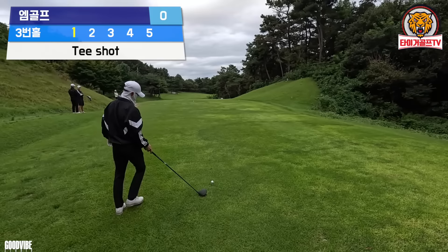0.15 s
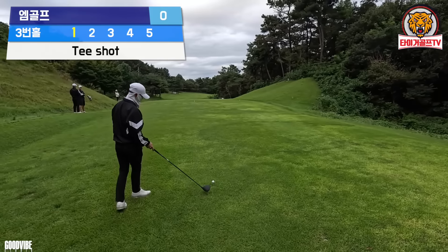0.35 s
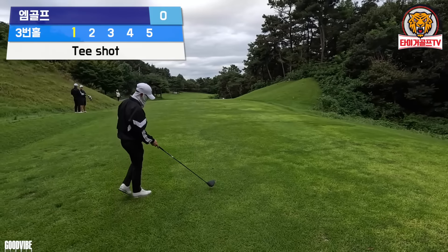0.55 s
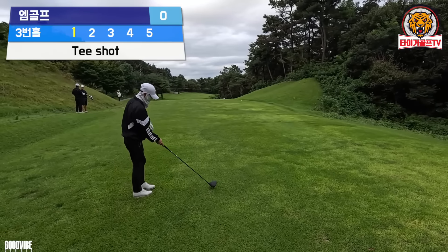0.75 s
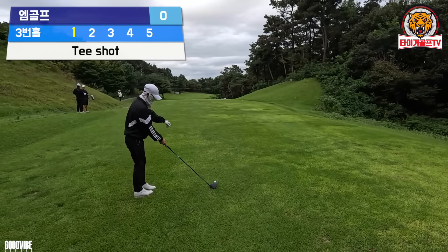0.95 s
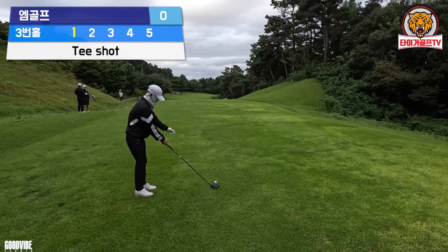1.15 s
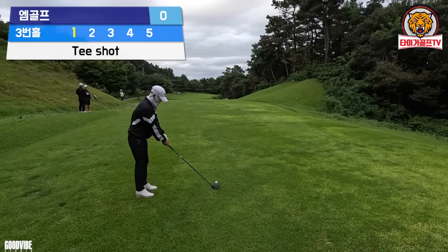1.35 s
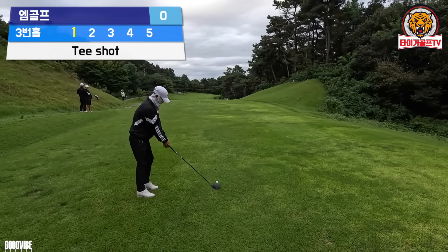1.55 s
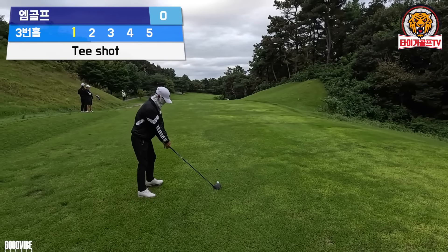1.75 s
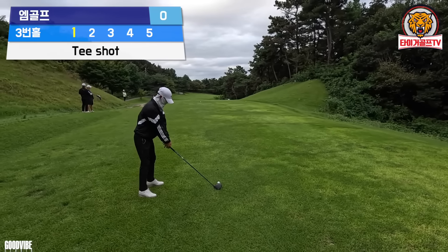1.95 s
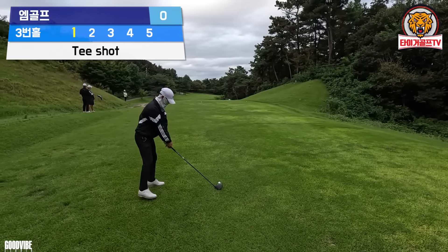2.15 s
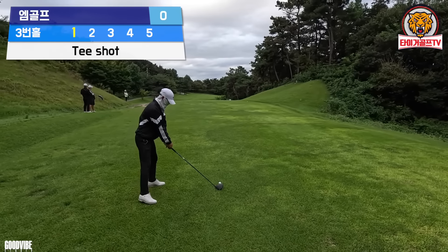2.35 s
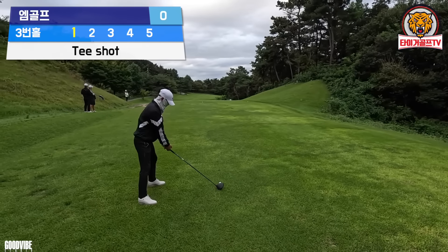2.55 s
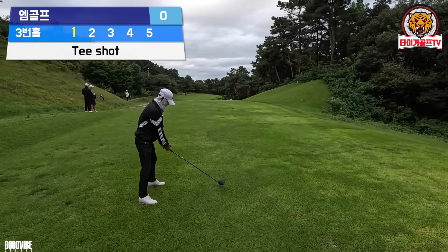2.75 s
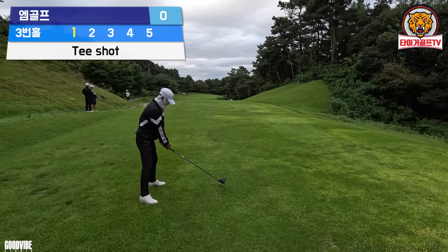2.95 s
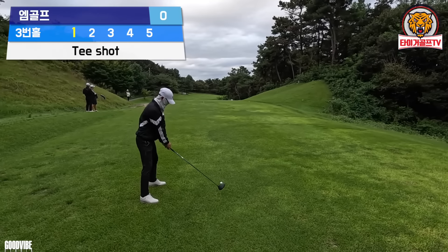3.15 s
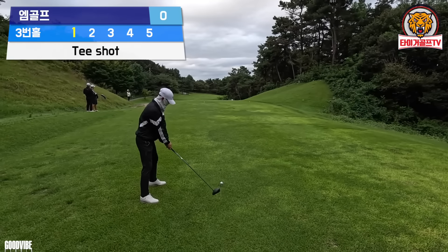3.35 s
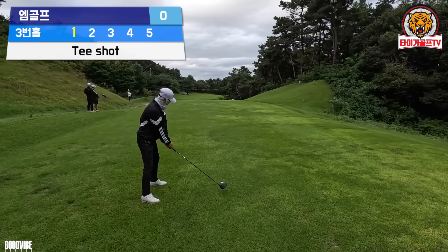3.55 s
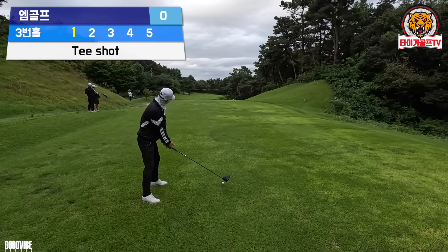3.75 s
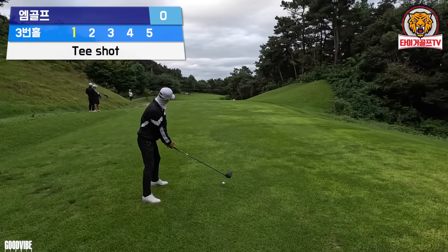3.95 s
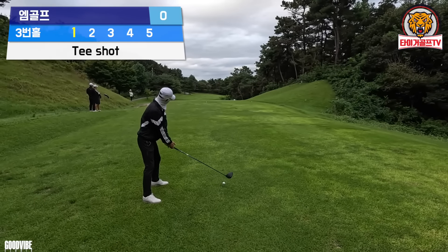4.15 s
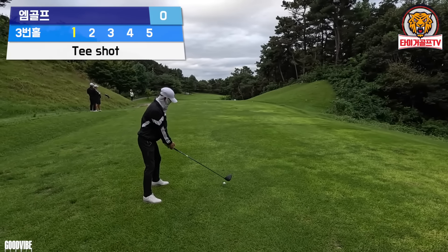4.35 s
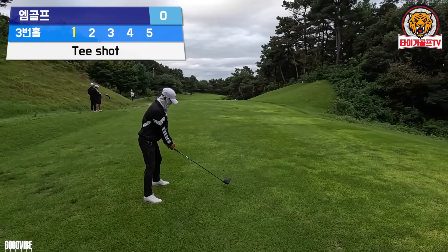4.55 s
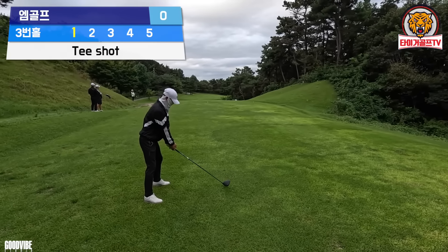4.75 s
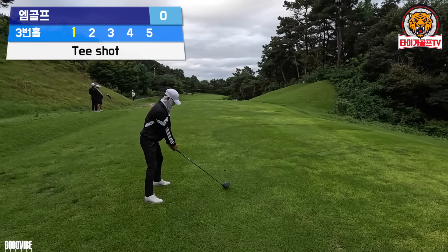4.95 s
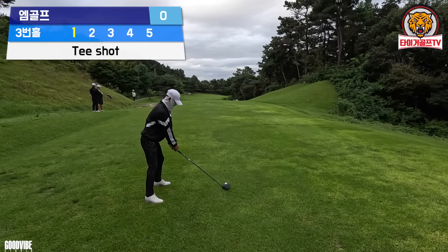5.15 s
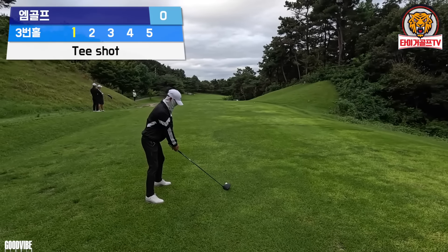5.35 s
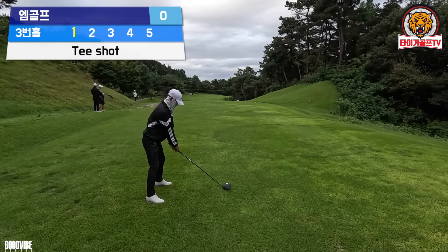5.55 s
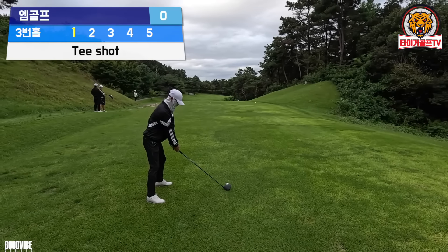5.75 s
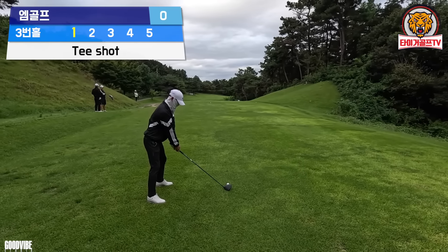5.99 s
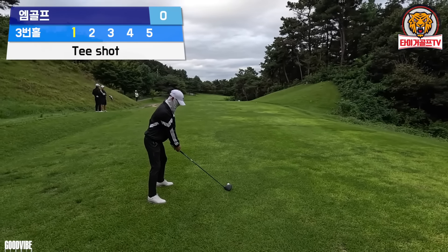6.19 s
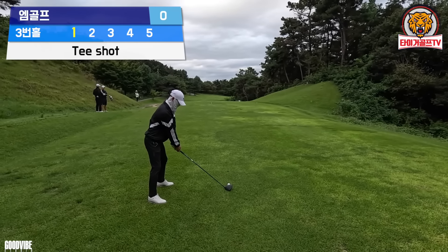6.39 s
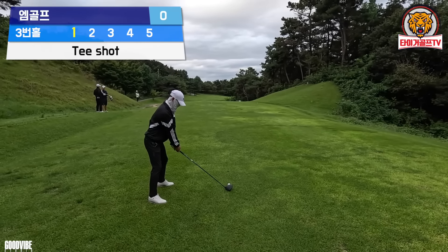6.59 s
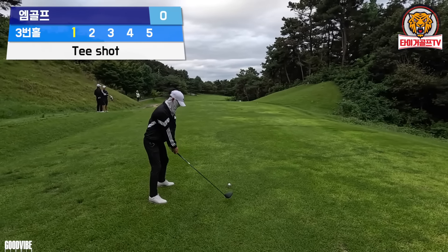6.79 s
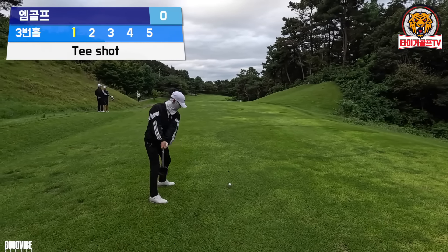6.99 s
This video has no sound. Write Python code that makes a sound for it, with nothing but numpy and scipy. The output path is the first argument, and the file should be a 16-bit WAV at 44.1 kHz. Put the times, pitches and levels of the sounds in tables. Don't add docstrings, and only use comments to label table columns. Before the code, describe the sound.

Faint cricket chirps over a soft breeze on a fairway; a club whooshes and cracks a ball hard, the hit scattering off trees.

```python
import sys
import numpy as np
from scipy import signal
from scipy.fft import rfft, irfft, next_fast_len
from scipy.io import wavfile
from scipy.ndimage import uniform_filter1d

SR = 44100
rng = np.random.default_rng(int(sys.argv[2]) if len(sys.argv) > 2 else 0)


def invert_db(x):
    u = np.asarray(x, float) / 20
    return 10 ** u


def to_wav(s):
    ch = np.atleast_2d(s).T
    pcm = np.round(np.clip(ch, -1, 1) * 32767)
    wavfile.write(sys.argv[1], SR, pcm.astype(np.int16))


N = 384993
TIME = np.arange(N) / SR
BLOW_S = 7.7241


def evened(x):
    return x / np.sqrt(np.mean(x ** 2) + 1e-20)


def level_over_time(rows):
    return np.interp(TIME, *np.transpose(rows))


def curve(rows, column, off=-150):
    rows = np.array(rows)
    return np.interp(TIME, rows[:, 0], rows[:, column], off, off)


def slow(per_s, count=30):
    t = TIME[::64]
    rate = np.geomspace(per_s / 15, per_s, count)[:, None]
    waves = np.sin(2 * np.pi * (rate * t + rng.random((count, 1)))) / rate ** 0.19
    return np.interp(TIME, t, evened(waves.sum(0)))


def add(mix, s, sound):
    part = mix[max(round(s * SR), 0):][:len(sound)]
    part += sound[:len(part)]


def noise(spectrum, patchy_db, size=512):
    bin_hz = np.fft.rfftfreq(size, 1 / SR)
    a, b, patches = rng.standard_normal((4 * N // size + 5, len(bin_hz), 3)).T
    patches = uniform_filter1d(patches, size=size // 64, axis=0)
    patches = evened(uniform_filter1d(patches, size=8192 // size, axis=1))
    hz, db = np.transpose(spectrum)
    colour_db = np.interp(np.log(bin_hz + 1), np.log(hz), db, -90, -90)[:, None]
    z = (a + 1j * b) * invert_db(colour_db + patchy_db * patches)
    return evened(signal.istft(z, nperseg=size, noverlap=3 * size // 4)[1][:N])


def resonate(x, hz, width):
    turn = np.exp(2j * np.pi * np.cumsum(hz * np.ones(len(x))) / SR)
    r = np.exp(-np.pi * width / SR)
    once = signal.lfilter([1 - r], [1, -r], x / turn)
    twice = signal.lfilter([1 - r], [1, -r], once)
    return evened((turn * twice).real)


def band(x, lo_hz, hi_hz):
    return signal.sosfiltfilt(signal.butter(4, [lo_hz, hi_hz], "band", fs=SR, output="sos"), x)


def burst(hz, length, glide):
    u = np.linspace(-.5, .5, round(length * SR))
    return np.cos(np.pi * u) ** 2 * np.sin(2 * np.pi * np.cumsum(hz * (1 + glide * u)) / SR)


def bursts(rows, glide):
    out = np.zeros(N)
    for s, db, hz, length in rows:
        add(out, s - length / 2, invert_db(db) * burst(hz, length, glide))
    return out


def modes(table, t):
    return sum(invert_db(db - 60 * t / t60) * np.sin(2 * np.pi * hz * t) for hz, db, t60 in table)


# time in seconds, level in dB.
WIND = [(0, -63.5), (1.15, -65), (1.6, -63.5), (3.2, -62), (3.9, -62.5), (4.4, -60.5), (5.7, -61),
        (6.1, -61), (7.3, -61), (8.73, -62)]
# pitch in Hz, strength in dB per Hz.
RUMBLE = [(15, -51.5), (25, -23.5), (52, 0.5), (97, 0.5), (141, -5), (292, -13), (322, -14.5), (500, -28.5),
          (650, -51.5), (1100, -120)]


def wind():
    lumps_db = slow(per_s=9)
    return invert_db(level_over_time(WIND) + lumps_db) * noise(RUMBLE, patchy_db=1.1, size=2048)


# middle in seconds, scuff on grass in dB, length in seconds,
# swish of cloth beside the scuff in dB.
MOVES = [(0.024, -66, 0.068, -2.5), (.13, -64, 0.11, -12), (0.338, -63, .1, -5.5), (.45, -71, 0.15, -3),
         (0.554, -68, 0.064, -9), (0.825, -74.5, .06, 2), (1.124, -69.5, 0.24, 3), (1.58, -79, 0.12, -2),
         (1.696, -74, 0.11, 2), (1.87, -81, .1, -8), (2.17, -74, .08, -3), (2.48, -74, .14, 1),
         (3.151, -74.5, .22, 13), (3.92, -82.5, .2, 1), (4.61, -89, 0.067, -2), (6.952, -73.5, .15, -12),
         (7.21, -68.5, 0.44, -6), (7.6, -69.5, 0.24, -1), (8.198, -64, 0.26, -7), (8.745, -59, 0.069, 8)]


def moves():
    s, db, length, cloth_db = np.transpose(MOVES)[:, :, None]
    t = TIME[::64]
    power = invert_db(db) ** 2 * np.exp(-(2.61 * (t - s) / length) ** 2)
    fizz_share = invert_db(-20) * .08 / length
    shares = 1, invert_db(cloth_db), fizz_share
    return [np.interp(TIME, t, np.sqrt((power * share ** 2).sum(0))) for share in shares]


# time in seconds, level in dB.
BREEZE = [(0, -70), (.7, -71.5), (1.3, -67.5), (2.3, -72), (2.75, -66.5), (2.95, -71.5), (3.45, -68),
          (3.85, -73.5), (5.1, -69), (5.7, -74), (6.5, -72.5), (7.2, -71), (7.5, -73.5), (8.1, -67.5),
          (8.5, -70.5)]
# pitch in Hz, strength in dB per Hz.
RUSTLE = [(150, -8.5), (230, 4.5), (330, -3), (480, -2), (850, -6), (1280, -4), (1700, -9.5), (2300, -18.5),
          (3000, -29)]
SCUFF = [(1200, -5.5), (1900, -1), (2600, -4.5), (3400, -4.5), (5000, -8), (7000, -16), (8300, -24.5),
         (8900, -46)]
FIZZ = [(9000, -31.5), (9500, -14), (10500, -8.5), (12000, -0.5), (12900, -7.5), (13300, -26.5)]


def rustles():
    breeze = invert_db(level_over_time(BREEZE) + 0.5 * slow(per_s=9))
    feet, cloth, blades = moves()
    rustle = np.hypot(breeze, cloth)
    scuff = np.hypot(invert_db(-11.5) * breeze, feet)
    fizz = np.hypot(invert_db(-97), blades)
    mid = rustle * noise(RUSTLE, patchy_db=1.5) + scuff * invert_db(-1.5) * noise(SCUFF, patchy_db=-0.5)
    mid += fizz * noise(FIZZ, patchy_db=1.1)
    return mid, fizz * invert_db(-5.0) * noise(FIZZ, patchy_db=0.5)


# pitch in Hz, strength in dB per Hz.
FAR_INSECTS = [(5300, -10.5), (6100, -6.5), (7200, 1), (7900, -8), (8600, -22.5), (8900, -47)]


def far_insects():
    return invert_db(-78) * noise(FAR_INSECTS, patchy_db=1.7)


# time in seconds, level in dB.
CHORUS = [(0, -61.5), (.1, -60.5), (1.26, -61), (1.6, -61.5), (3.6, -61), (5.3, -62.5), (6.0, -59),
          (6.4, -63), (7.5, -62), (8.73, -62.5)]
# pitch in Hz, strength in dB per Hz.
CHORUS_COLOUR = [(1940, -56.5), (3300, -28), (3590, -18.5), (4000, -6.5), (4320, 2), (4530, 0.5),
                 (4990, -9.5), (5560, -16), (6100, -31), (7930, -56.5), (13400, -120)]


def chorus(count=22):
    out = np.zeros(N)
    for pitch, pace, size, phrase, start in rng.random((count, 5)):
        strokes = np.diff(np.floor(TIME * (54 + 12 * pace) + start), prepend=0) > 0
        singing = np.sin(2 * np.pi * (TIME * (4.5 + 2.5 * phrase) + start)) > -.3
        stroke = burst(4020 + 660 * pitch, length=.011, glide=-.13)
        out += invert_db(-7 * size - 4 * pitch) * signal.oaconvolve(1. * strokes * singing, stroke)[:N]
    blur = noise(CHORUS_COLOUR, patchy_db=1.74)
    swell_db = 0.45 * slow(per_s=7)
    return invert_db(level_over_time(CHORUS) + swell_db) * evened(evened(out) + 1.7 * blur)


# first chirp in seconds, last chirp in seconds, stroke level in dB.
PHRASES = [
    (0.0, 0.0, -58),
    (.146, .508, -59.5),
    (1.982, 2.688, -57),
    (3.656, 4.006, -63),
    (4.161, 5.059, -56.5),
    (6.112, 6.112, -61),
    (6.287, 7.185, -55.5),
    (7.095, 7.095, -59),
    (8.549, 8.549, -55),
]
# level in dB of each, four of its own and three from the neighbour.
STROKES_DB = [
    3,
    4.5,
    5.5,
    4.5,
    -6,
    -6,
    -8,
]


def near_cricket():
    chirp_gap_s, stroke_gap_s = .178, .0175
    out = np.zeros(N)
    for first, last, db in PHRASES:
        times = np.linspace(first, last, round((last - first) / chirp_gap_s) + 1)
        edge = abs(2 * (times - first) / max(last - first, chirp_gap_s) - 1) ** 2
        chirps_db = db - 1.5 * edge
        for s, chirp_db, chance in zip(times, chirps_db, rng.standard_normal((len(times), 7, 2))):
            for k, stroke_db in enumerate(STROKES_DB):
                stroke = burst(4830 + 40 * chance[k, 0], length=.012, glide=-0.2)
                add(out, s + stroke_gap_s * k, invert_db(chirp_db + stroke_db + 1.6 * chance[k, 1]) * stroke)
    leaves = rng.standard_normal(2000) * invert_db(-60 * np.arange(2000) / SR / 0.025)
    return out + invert_db(-8.5) * signal.oaconvolve(out, leaves / np.linalg.norm(leaves))[:N]


def automatic_gain():
    since = TIME - BLOW_S
    down = np.clip(since / .15, 0, 1)
    up = np.clip((since - 0.53) / 0.17, 0, 1)
    dip_left = 0.52
    return invert_db(2.5 - 5.5 * down * (1 - (1 - dip_left) * up))


def background():
    mid, side = rustles()
    mid = mid + wind() + chorus() + near_cricket() + far_insects()
    return automatic_gain() * np.array([mid + side, mid - side])


# middle in seconds, peak level in dB, pitch in Hz, length in seconds.
KNOCK = [
    (8.7095, -43.5, 444, 0.0094),
    (8.7185, -55, 1140, .007),
    (8.7255, -52, 1210, 0.0088),
]


def knock():
    return bursts(KNOCK, glide=.1)


# time in seconds, level in dB.
ECHO = [
    (7.74, -63),
    (7.748, -49.5),
    (7.812, -55.5),
    (7.894, -44),
    (8.068, -56),
    (8.162, -64.5),
    (8.25, -73),
]
# pitch in Hz, strength in dB per Hz.
ECHO_COLOUR = [(88, -44), (150, -13), (208, -27), (242, -10), (438, -4), (561, -17), (667, -2),
               (1230, -6.5), (1980, -2.5), (2310, -10), (3950, -1), (6020, -8), (9160, -33.5), (12000, -30),
               (14500, -59)]


def tree_echo():
    trees = noise(ECHO_COLOUR, patchy_db=.8, size=256)
    top = band(trees, 6500, 14000)
    since = np.clip(TIME - BLOW_S, 0, 1)
    trees = trees - top + invert_db(6.0 - 52 * abs(since - .16)) * top
    return invert_db(curve(ECHO, column=1) - 0.1) * trees


# time in seconds, level in dB, pitch factor.
FOLLOW = [
    (7.728, -51, .985),
    (7.75, -53, .995),
    (7.79, -54.5, 1.03),
    (7.84, -58, 1.075),
    (7.9, -57.5, 1.1),
    (8.0, -61, 1.125),
    (8.12, -80, 1.14),
]
# pitch in Hz, width in Hz, level in dB, extra change in dB a second.
HEAD = [
    (1800, 50, 1.5, -12),
    (2910, 60, 0.0, -70),
    (3390, 120, -0.5, -25),
]


def ringing_head():
    air = rng.standard_normal(N)
    factor = curve(FOLLOW, column=2, off=0.94)
    since = np.clip(TIME - BLOW_S, 0, 1)
    turns = np.cumsum(factor) / SR
    clear = np.exp(-since / .25)
    head = np.zeros(N)
    for hz, width, db, fade_db in HEAD:
        pure = np.sin(2 * np.pi * hz * turns)
        blurred = resonate(air, hz * factor, width)
        head += invert_db(db + fade_db * since) * (clear * pure + (1 - clear) * blurred)
    return invert_db(curve(FOLLOW, column=1)) * head


# time in seconds, shaft whistle in dB, whistle pitch in Hz.
SWING = [
    (7.57, -73, 483),
    (7.63, -55, 563),
    (7.66, -42, 620),
    (7.69, -32.5, 710),
    (7.715, -31, 774),
    (7.7235, -28.5, 820),
    (7.735, -68, 820),
]
# middle in seconds, peak level in dB, pitch in Hz, length in seconds.
EDDIES = [
    (7.665, -32, 668, .018),
    (7.672, -36, 293, .03),
    (7.685, -23, 788, 0.015),
    (7.696, -29, 742, .01),
    (7.708, -16.5, 824, 0.014),
    (7.708, -34, 1695, 0.01),
    (7.687, -40, 2014, 0.0088),
]


def swing():
    hz = curve(SWING, column=2, off=600)
    air = rng.standard_normal(N)
    whistle = resonate(air, hz, 260) + 0.25 * resonate(air, 2 * hz, 450)
    rush = resonate(air, 290, 160)
    hiss_colour = [(900, 1.0), (2000, 2.0), (4000, -0.5), (6500, -12.5), (8500, -27.0), (9200, -41.5),
                   (12000, -29), (13500, -52)]
    hiss = noise(hiss_colour, patchy_db=3.0, size=256)
    whistle_db = curve(SWING, column=1, off=-300)
    under_db = np.minimum(whistle_db + 32, 0)
    blow_hiss = invert_db(-24) * np.exp(-abs(TIME - BLOW_S) / .003)
    layers = invert_db(whistle_db) * whistle + invert_db(-44 + 0.54 * under_db) * rush
    layers += (invert_db(-46 + 0.52 * under_db) + blow_hiss) * hiss
    return layers + bursts(EDDIES, glide=0.1)


# pitch in Hz, level in dB, seconds to fade by 60 dB.
CLUB = [(1410, -9, .009), (2060, -9.5, 0.005), (2690, -10.5, 0.0076), (3370, 2.5, 0.0044),
        (2910, -24.5, 0.037), (3580, -23, 0.021), (3700, -14.5, 0.014), (4170, -15, 0.0073),
        (4640, -27.5, 0.021), (5340, -31.5, 0.04), (5810, -17.5, 0.017), (5930, -21.5, 0.013),
        (7100, -24, 0.0072), (7960, -7.5, 0.0022), (9200, -16, 0.0013), (11800, -26.5, .003),
        (13980, -35, .003)]
# pitch in Hz, level in dB, seconds to fade by
# 60 dB.
RECOIL = [
    (60, -38, .07),
    (153, -29, 0.064),
    (257.7, -45, 0.25),
    (620, -11.5, 0.014),
    (820, -9.5, 0.0109),
]


def blow():
    t = np.arange(SR // 8) / SR
    face = modes(CLUB, t) * (1 - np.exp(-t / .00006))
    spray_colour = [(400, -11.5), (2000, -10.5), (3600, -1.0), (4700, -9), (6200, -7), (7800, -25.0),
                    (9500, -37), (12000, -40.5), (13500, -57.0)]
    spray = noise(spray_colour, patchy_db=3.0, size=256)[:len(t)]
    swell = (t / 0.0039) ** 2 * np.exp(1 - (t / 0.004) ** 2)
    thud = invert_db(-16.5) * swell * np.sin(2 * np.pi * 250 * t)
    from_turf = band(face, 700, 6500) * (1 - np.exp(-(t / 0.00041) ** 2))
    out = np.zeros(N)
    add(out, BLOW_S, face + spray * invert_db(-22.5 - 60 * t / .032))
    add(out, BLOW_S + .0001, -modes(RECOIL, t))
    add(out, BLOW_S + 0.00031, thud)
    add(out, BLOW_S + .0031, -invert_db(-13.5) * from_turf)
    return out


def scene():
    ceiling = 0.65
    crack = ceiling * np.tanh(blow() / ceiling)
    crack = band(crack, 45, 17000)
    rush = swing() + ringing_head() + tree_echo()
    front = band(np.roll(crack, 4) * np.exp(-((TIME - BLOW_S) / .002) ** 2), 2300, 12500)
    side = invert_db(-12.5) * front + invert_db(-2.5) * band(np.roll(rush, 90), 10800, 13000)
    mid = crack + rush + knock()
    return background() + np.array([mid + side, mid - side])


def roll_off(x):
    return signal.sosfilt(signal.butter(12, 16470, fs=SR, output="sos"), x)


# pitch in Hz, gain in dB.
OVERALL_COLOUR = [(25, -10), (60, -3.5), (150, -0.5), (8750, -1), (8950, -9), (9150, -13), (9400, -3),
                  (13000, -2), (14500, -6.5), (16200, -25.5)]


def record(dry):
    hz, db = np.transpose(OVERALL_COLOUR)
    size = next_fast_len(N)
    colour = invert_db(np.interp(np.log(np.fft.rfftfreq(size, 1 / SR) + 1), np.log(hz), db))
    mix = irfft(rfft(dry, size) * colour, size)[:, :N]
    return roll_off(mix)


dry = scene()
out = record(dry)
to_wav(out)
```